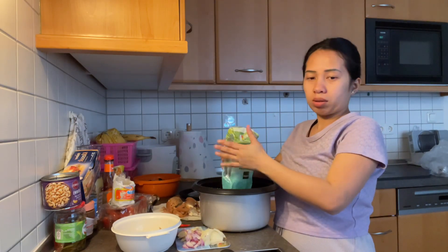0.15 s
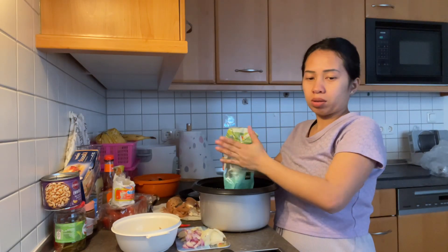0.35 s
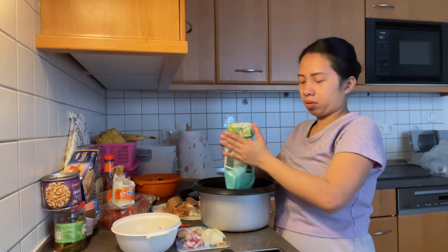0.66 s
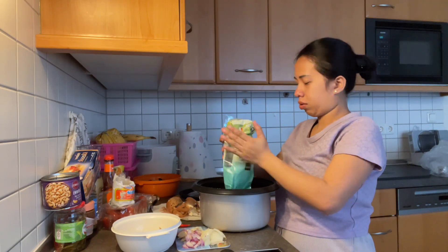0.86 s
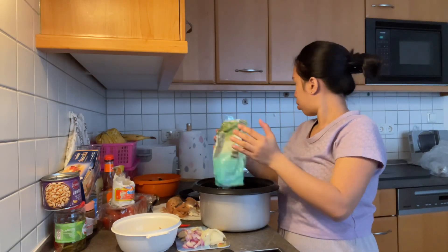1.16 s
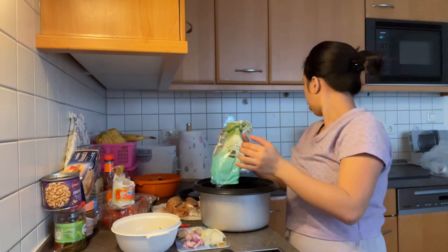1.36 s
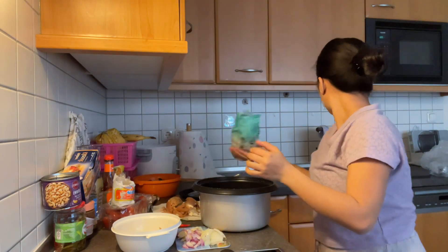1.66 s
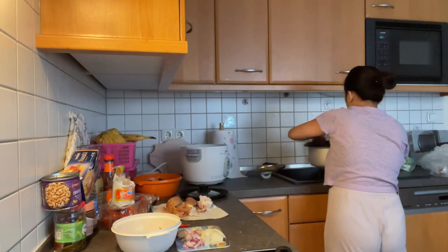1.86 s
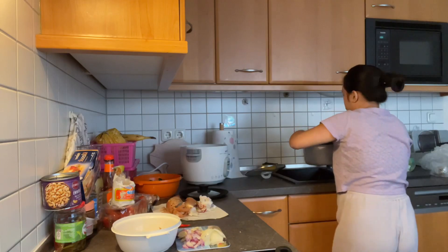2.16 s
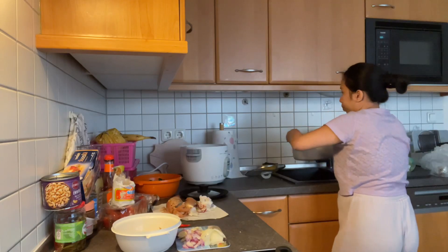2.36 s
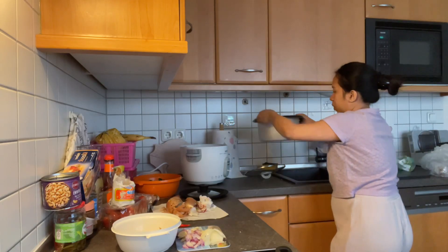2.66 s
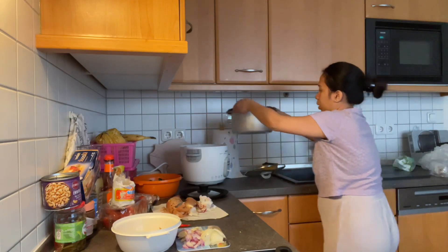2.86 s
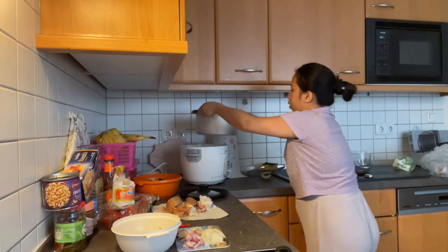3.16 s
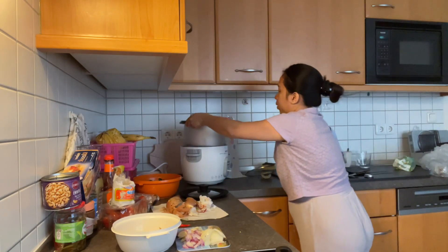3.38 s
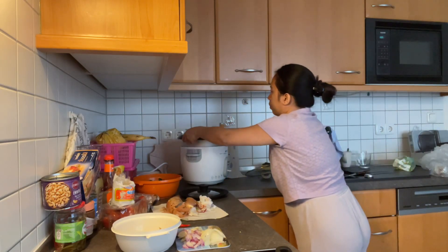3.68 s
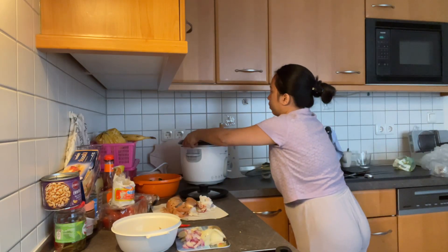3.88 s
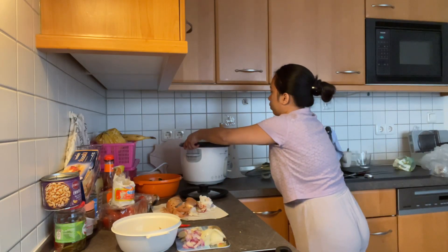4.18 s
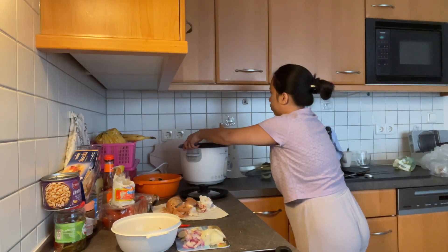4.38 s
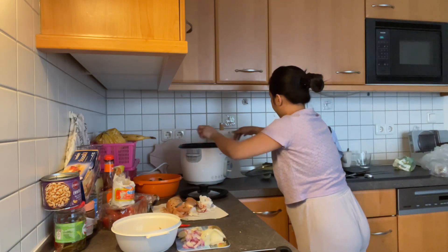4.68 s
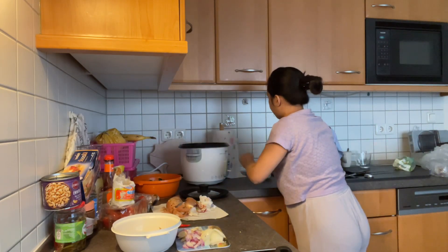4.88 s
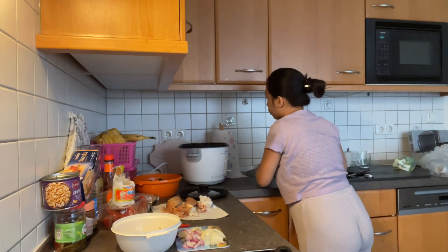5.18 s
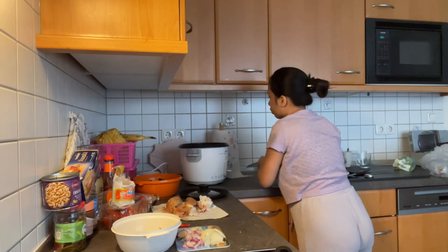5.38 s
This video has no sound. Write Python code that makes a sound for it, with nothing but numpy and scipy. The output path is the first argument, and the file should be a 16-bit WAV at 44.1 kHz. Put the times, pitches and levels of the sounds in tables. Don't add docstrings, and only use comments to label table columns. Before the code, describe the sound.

Hands pat a plastic bag, shaking dry grains into a booming metal pot; then plastic snaps, a pot clanks into its cooker and knocks the counter.

```python
import sys
import numpy as np
from scipy import signal
from scipy.fft import rfft, irfft, next_fast_len
from scipy.io import wavfile
from scipy.ndimage import uniform_filter1d

SR = 44100
rng = np.random.default_rng(int(sys.argv[2]) if len(sys.argv) > 2 else 0)


def to_wav(sig):
    pcm = np.clip(np.atleast_2d(sig), -1, 1) * 32767
    pcm = np.round(pcm).astype(np.int16)
    wavfile.write(sys.argv[1], SR, pcm.T)


def to_linear_factor(level_db):
    exponent = np.asarray(level_db, float) / 20
    return 10 ** exponent


N = 244049
TIME_S = np.arange(N) / SR
CHANGE_S = 1.798


def rms_one(x):
    return x / np.sqrt(np.mean(x ** 2) + 1e-20)


def in_time(rows):
    s, level_db = np.transpose(rows)
    return np.interp(TIME_S, s, level_db)


def at_hz(points, hz):
    point_hz, value = np.transpose(points)
    return np.interp(np.log(hz + 1), np.log(point_hz), value)


def coloured(x, spectrum):
    size = next_fast_len(N)
    gain = to_linear_factor(at_hz(spectrum, np.fft.rfftfreq(size, 1 / SR)))
    return irfft(rfft(x, size) * gain, size)[..., :N]


def band(x, low_hz, high_hz):
    edges_hz = [low_hz, min(high_hz, 0.49 * SR)]
    return signal.sosfilt(signal.butter(2, edges_hz, "band", fs=SR, output="sos"), x)


def below(x, hz):
    return signal.sosfiltfilt(signal.butter(2, hz, fs=SR, output="sos"), x)


def ring(clicks, hz, t60_s):
    r = to_linear_factor(-60 / (max(t60_s, 0.003) * SR))
    w = 2 * np.pi * hz / SR
    return signal.lfilter([0, np.sin(w)], [1, -2 * r * np.cos(w), r * r], clicks + 1e-18)


def dying(t60_s, rise_s, size=22050):
    t = np.arange(size) / SR
    rise = 1 - np.exp(-t / max(rise_s, 1e-5))
    return t, rise * to_linear_factor(-60 * t / max(t60_s, 0.003))


def add(track, s, sound):
    i = round(s * SR)
    track[..., i:i + sound.shape[-1]] += sound[..., :N - i]


def grains(per_s, spread_db):
    sizes = to_linear_factor(spread_db * np.minimum(rng.exponential(1, N), 4)) * rng.choice([-1, 1], N)
    return rms_one(sizes * (rng.random(N) < per_s / SR))


def drift(rate_hz):
    knots = rng.standard_normal(2000)
    return np.interp(TIME_S * rate_hz, np.arange(len(knots)), knots)


def touch_rings(touches):
    out = np.zeros(N)
    for (s, db, hz, t60_s), turns in zip(touches, rng.random((len(touches), 2))):
        t, env = dying(t60_s, rise_s=0.0015, size=13000)
        pair = np.sin(2 * np.pi * (hz * t + turns[0]))
        pair += 0.36 * np.sin(2 * np.pi * (1.1 * hz * t + turns[1]))
        add(out, s, to_linear_factor(db) * env * pair)
    return out


# [t/s, level/dB, rise/s, fall/s; both over 20 dB]
LEANS = [
    (2.93, -51, 0.13, 0.05),
    (3.999, -43.5, 0.16, 0.17),
    (4.192, -29, 0.036, 0.13),
    (4.502, -33, 0.22, 0.02),
    (4.71, -49.5, 0.3, 0.14),
    (5.1, -63.5, 0.18, 4.5),
]


def counter_hum():
    load = 0
    for s, db, rise_s, fall_s in LEANS:
        load = load + to_linear_factor(db - 20 * np.maximum((s - TIME_S) / rise_s, (TIME_S - s) / fall_s))
    hum_hz = 44 + 2.0 * drift(6.6)
    hum = (to_linear_factor(-59.5) + load) * np.sin(2 * np.pi * np.cumsum(hum_hz) / SR)
    rumble_level = np.minimum(to_linear_factor(-65) + load * to_linear_factor(-7.5), to_linear_factor(-56.5))
    rumble = rumble_level * rms_one(band(rng.standard_normal(N), 44, 93.6))
    wake = np.clip((TIME_S - CHANGE_S) / 0.16, 0, 1) ** 2
    return (hum + rumble) * wake * to_linear_factor([[1.5], [-1.5]])


def wide_noise(spectrum, side_gain):
    mid, side = rms_one(coloured(rng.standard_normal((2, N)), spectrum))
    return mid + side_gain * side * [[1], [-1]]


# [t/s, level/dB]
HANDLING = [(1.82, -67.5), (2.02, -63.5), (2.19, -72), (2.58, -62.5), (2.95, -67.5), (3.06, -54.5),
            (3.22, -67), (3.4, -61), (3.63, -67), (3.83, -58.5), (4.0, -74), (4.17, -44), (4.36, -55.5),
            (4.55, -53), (4.65, -54.5), (4.71, -68.5), (5.15, -67), (5.53, -70)]
# [f/Hz, level/dB per Hz]
RUSTLE = [(150, 13), (250, -10), (343, -10), (768, -13.5), (1130, -5), (1880, -7), (2200, -7.5),
          (3120, -9.5), (3530, -13.5), (5760, -15), (9250, -8), (10300, -43), (10800, -43), (13400, -9.5),
          (16500, -101)]


def hand_rustle():
    return to_linear_factor(in_time(HANDLING) + 0.5 * drift(24)) * band(wide_noise(RUSTLE, 1.11), 217, 5240)


# [t/s, level/dB]
FILM = [(1.85, -80), (1.96, -72.5), (2.08, -71), (2.16, -70), (2.3, -73), (2.82, -80.5), (3.13, -81.5),
        (3.53, -75.5), (4.04, -85), (4.19, -80), (4.31, -77), (4.35, -68), (4.48, -74), (4.65, -81),
        (4.77, -85), (5.02, -80.5), (5.53, -83.5)]
# [f/Hz, level/dB per Hz]
THIN = [(3500, -8), (5500, -36), (7000, -23), (9250, 1.5), (10300, -17), (11500, -9.5), (12800, -7),
        (15200, -14)]


def film_rustle():
    film_db = in_time(FILM)
    flicker = to_linear_factor(4 * drift(11))
    film = band(wide_noise(THIN, 1.1), 2500, 15000)
    lower = below(film, 7500)
    fill = to_linear_factor(0.48 * (film_db - film_db.mean()) + 2.1 * drift(22))
    return to_linear_factor(film_db + 1.0) * flicker * (film - lower + fill * lower)


# [t/s, level/dB, centre f/Hz, t60/s]
SWISH = [
    (2.79, -68.5, 450, 0.87),
    (3.064, -53, 1304, 0.4),
    (3.23, -57.5, 301, 0.37),
    (3.868, -58, 560, 0.49),
    (4.56, -45.5, 2300, 0.32),
]


def swish():
    out = np.zeros(N)
    for s, db, hz, t60_s in SWISH:
        t, env = dying(t60_s, rise_s=0.0025)
        add(out, s, to_linear_factor(db) * env * rms_one(band(rng.standard_normal(len(t)), 0.74 * hz, 1.4 * hz)))
    return out


# [t/s, peak level/dB, thud f/Hz, thud t60/s, scuff level/dB]
KNOCK = [(2.1458, -63, 71.7, 0.29, -44), (2.871, -54.5, 160.8, 0.35, -44),
         (3.199, -52.5, 169.2, 0.32, -53.5), (3.244, -43, 154.1, 0.24, -57),
         (3.865, -62, 75.5, 0.43, -50.5), (4.139, -45.5, 129.8, 0.39, -61), (4.325, -49, 74.6, 0.69, -42.5),
         (4.376, -32.5, 117, 0.41, -32.5), (4.397, -28, 99.8, .3, -48), (4.56, -43.5, 126, 0.24, -43),
         (5.181, -49.5, 131, 0.25, -62.5), (5.211, -35, 119, 0.093, -44), (5.239, -35.5, 88.4, 0.26, -48.5),
         (5.288, -43.5, 126, 0.38, -66)]
# [t/s, level/dB]
SLIDES = [
    (2.146, -57),
    (2.871, -56),
    (4.138, -34.5),
    (4.325, -45.5),
    (4.369, -32.5),
    (5.2, -83),
]


def knocks():
    thud, scuff, wash = np.zeros((3, N))
    for s, db, hz, t60_s, scuff_db in KNOCK:
        t, env = dying(t60_s, rise_s=0.0018)
        pair = np.sin(2 * np.pi * hz * t) + 0.62 * np.sin(2 * np.pi * 1.1 * hz * t)
        add(thud, s, to_linear_factor(db) * env * pair)
        add(scuff, s, to_linear_factor(scuff_db + 4.5) * dying(0.66 * t60_s, rise_s=0.0027)[1])
    for s, slide_db in SLIDES:
        add(wash, s, to_linear_factor(slide_db) * dying(0.27, rise_s=0.001)[1])
    rub = band(grains(per_s=3900, spread_db=4.0), 410, 1810)
    slide = grains(per_s=9300, spread_db=0.5)
    slide = band(slide, 1650, 7630) + 0.12 * band(slide, 12800, 14000)
    return thud + scuff * rub + wash * slide


# [t/s, level/dB, f/Hz, t60/s]
LOCAL_RINGS = [(4.176, -40, 500, 0.1), (4.236, -43, 550, .07), (4.325, -50, 1134, 0.079), (4.399, -40, 765, 0.14),
               (4.421, -50, 430, .07), (4.461, -47.5, 775, .3), (4.557, -43, 3120, 0.09), (4.591, -56, 302, 0.09),
               (4.601, -57, 771, 0.25), (5.202, -47, 741, .035), (5.211, -68, 3710, .11),
               (5.231, -54, 1270, 0.076), (5.241, -61, 2160, 0.14), (5.301, -62, 2230, .18),
               (5.356, -80, 5260, .35), (5.446, -68, 2050, 0.29), (5.516, -69, 3570, 0.027)]


def local_rings():
    return touch_rings(LOCAL_RINGS)


# [t/s, blow level/dB, scrape t60/s]
CLANKS = [
    (4.139, -52.5, 0.089),
    (4.31, -68, 0.18),
    (4.368, -51.5, 0.056),
    (5.195, -63.5, 0.095),
    (5.232, -69, 0.072),
    (5.395, -81.5, 0.121),
    (5.45, -87, 0.089),
]
# [f/Hz, level/dB, t60/s]
RIM = [(440, -11.5, 0.21), (464, -10.5, 0.084), (501, 2, 0.09), (560, -4.5, 0.14), (598, -12.5, 0.1),
       (1114, -13.5, 0.13), (1400, -9.5, 0.091), (1809, -7, 0.064), (2300, -14.5, 0.1), (3390, -19, .08),
       (4370, -5.5, 0.12), (4850, -10, 0.08)]
SEAT = [(183.3, -1.5, 0.35), (283, -9, 0.14), (429.4, -1.5, 0.16), (493.6, 2.5, 0.095), (575, -11, 0.38),
        (766, -7, 0.35), (1068, -1.5, 0.14), (1107, 2, 0.042), (1230, -10, 0.14), (1408, -11, 0.18),
        (1820, -5, 0.11), (1930, -9, 0.068), (2540, -9, .1), (3050, -6, 0.078)]
UTENSIL = [(550, -8.5, 0.033), (730, -1, 0.017), (1030, -10, 0.032), (1253, -2, 0.034), (1490, -15, 0.037),
           (2160, -26, 0.25), (2600, -13.5, 0.074), (3200, -23, 0.08), (5030, -28.5, 0.23)]
TINES = [(855, -6.5, 0.07), (1350, -9, .08), (2047, -19, 0.21), (2230, -7.5, 0.1), (3000, -6.5, 0.077),
         (4000, -14.5, 0.12), (5200, -20, 0.14)]


def clanks():
    out = np.zeros(N)
    struck = [RIM, RIM[:5], SEAT, UTENSIL, UTENSIL, TINES, TINES]
    for (s, db, t60_s), modes in zip(CLANKS, struck):
        t, env = dying(t60_s, rise_s=0.0044)
        for hz, mode_db, ring_t60_s in modes:
            scrape = to_linear_factor(db + mode_db) * env * rng.standard_normal(len(t))
            add(out, s, ring(scrape, hz, ring_t60_s))
    return out


def snap(hz, top_db, low_db, crisp_db, edge_hz):
    def burst(t60_s, rise_s):
        return dying(t60_s, rise_s, size=4410)[1]

    common, apart = rng.standard_normal((2, 4410))
    noise = 0.61 * common + apart * [[0.19], [0.061]]
    t, env = dying(0.012, rise_s=0.0003, size=4410)
    pair = np.sin(2 * np.pi * hz * t) + 0.46 * np.sin(2 * np.pi * 1.115 * hz * t)
    out = env * pair + 3.24 * burst(0.04, 0.0014) * band(noise, 0.927 * hz, 1.106 * hz)
    out += to_linear_factor(crisp_db) * burst(0.015, 0.0001) * band(band(noise, 4800, 8900), 4800, 8900)
    out += to_linear_factor(top_db + 6.0) * burst(0.019, 0.00043) * band(noise, 0.51 * edge_hz, edge_hz)
    out += to_linear_factor(low_db + 14.5) * burst(0.029, 0.0024) * band(noise, 570, 1620)
    return out


# [t/s, peak level/dB, ring f/Hz, dull and crisp level/dB re peak]
CARRY_SNAPS = [(1.8596, -49, 2390, -30, -13), (2.146, -40, 2700, -6, -12), (2.183, -41.5, 1130, 7, 1),
               (2.2081, -36, 2960, -16, -21), (2.223, -36.5, 3160, -25, -17),
               (2.2598, -32.5, 2120, -21, -8), (2.392, -37.5, 2940, -38, -29),
               (2.4135, -37.5, 2410, -20, -13), (2.4718, -40, 3080, -17, -7), (2.5615, -42, 2960, -22, 4),
               (2.635, -40, 2150, -12, -15), (2.6453, -27, 2755, -13, -14.5),
               (2.8732, -36, 2700, -3.5, -12), (3.0689, -49.5, 1640, 9, -14),
               (3.0778, -40, 2790, -2.5, -4.5), (3.268, -52.5, 2220, -11, -11)]
SEAT_SNAPS = [(3.4297, -43, 3000, -11, -8), (3.4885, -50, 2340, -14, -18), (3.5118, -46, 2550, -15.5, -9),
              (3.5165, -36.5, 2700, -16, -16), (3.6121, -30.5, 2724, -11.5, -15),
              (3.7334, -33.5, 2850, -22, -16), (3.7783, -45, 2820, -39, -3),
              (3.929, -37.5, 2800, -8.5, -11), (3.9848, -41, 2870, -18, -12), (4.0522, -38, 2750, -17, -14),
              (4.0667, -34, 2120, -6, -21), (4.127, -36.5, 2700, -6, -23), (4.2, -35.5, 2700, -23, -17),
              (4.3301, -42.5, 3100, -16, 4), (4.5423, -41, 2700, -25, -22), (4.5545, -29, 3050, -24, -10),
              (4.556, -33, 2030, -14, -18), (4.8286, -43, 2140, -17, -14), (4.9167, -37.5, 2070, -18, -31),
              (4.9317, -33, 2770, -17, -27), (5.0412, -35, 2820, -18.5, -16), (5.3216, -50, 2740, -25, -5)]
# [t/s, peak level/dB, ring f/Hz, bright level/dB re peak]
TICKS = [(1.9737, -50.5, 1810, 5.5), (2.004, -46.5, 3100, -3), (2.038, -51, 3180, -2.5),
         (2.1151, -42.5, 2490, -10), (2.172, -43, 3070, -8), (2.182, -37, 3350, 3.5),
         (2.3028, -57.5, 2490, 7.5), (2.494, -51, 1720, 3.5), (2.5391, -45.5, 2950, -4),
         (2.596, -42, 3060, -7), (2.689, -37.5, 3060, -16), (2.9037, -42.5, 2620, -1),
         (2.972, -39, 2790, -8), (3.5739, -46.5, 12800, -16), (4.599, -50.5, 4620, -20),
         (4.621, -46, 3180, -7.5), (4.717, -57, 13700, 2.5), (4.8292, -61, 4530, -4),
         (4.96, -56.5, 2700, 7), (2.294, -60, 9100, 1), (2.853, -63, 8140, -3), (2.985, -63, 13000, 11),
         (3.267, -66, 4460, 6), (3.468, -64, 13400, 2), (3.492, -71, 13700, -8), (3.93, -69, 13900, 7),
         (5.3221, -66, 5530, -12), (4.8185, -63, 8830, -22), (4.858, -64, 8900, -21),
         (5.0258, -72, 9030, -22), (5.084, -63, 8930, -22), (5.13, -64, 8830, -22)]


def crackles():
    out = np.zeros((2, N))
    events = []
    for s, db, hz, low_db, crisp_db in list(CARRY_SNAPS) + list(SEAT_SNAPS):
        events.append((s, db, snap(hz, -57, low_db, crisp_db, edge_hz=7100)))
    for s, db, hz, top_db in TICKS:
        events.append((s, db, snap(hz, top_db, low_db=-19, crisp_db=-9.5, edge_hz=12500)))
    for s, db, sound in events:
        pan_db = 6 + 13 * rng.uniform(-1, 1)
        add(out, s, sound * to_linear_factor([[db + 0.5 + pan_db / 2], [db + 3.5 - pan_db / 2]]))
    return out


# [t/s, level/dB, f/Hz, t60/s]
PINGS = [(0.0947, -22.5, 3007, 0.031), (0.1, -30.5, 992, 0.054), (0.2585, -14.5, 3050, 0.023),
         (0.264, -19.5, 1592, 0.06), (0.264, -27.5, 602, 0.067), (0.308, -33.5, 420, 0.044),
         (0.344, -35, 5500, 0.039), (0.433, -22.5, 1450, 0.05), (0.43, -19, 2910, 0.033),
         (0.434, -27, 1230, 0.042), (0.4653, -22.5, 3500, .02), (0.4785, -28, 3730, .02),
         (0.5057, -30, 1320, 0.02), (0.5926, -21.5, 1577, .05), (0.6, -28.5, 286, 0.12),
         (0.625, -29.5, 433, 0.12), (0.6644, -22.5, 1620, 0.059), (0.6644, -26, 3310, 0.039),
         (0.7706, -23.5, 723, 0.13), (0.775, -27.5, 440.5, 0.058), (0.784, -24, 407, 0.021),
         (0.42, -35.5, 418, 0.044), (0.47, -36, 444, 0.074), (0.95, -36, 580, 0.044),
         (1.659, -36, 487, 0.035), (1.66, -47, 747, 0.04), (1.735, -48, 597, .05),
         (1.301, -44.5, 1050, 0.042), (0.805, -29, 420, 0.039), (0.8155, -17, 1630, 0.05),
         (0.8155, -30, 1260, 0.061), (0.831, -21, 3150, 0.045), (0.95, -18, 1607, 0.055),
         (0.9478, -19, 2500, 0.023), (0.984, -25.5, 1634, 0.048), (0.9862, -32, 3660, 0.028),
         (1.1365, -30, 3350, 0.026), (1.1189, -38.5, 4450, 0.021)]


def clump_pings():
    return touch_rings(PINGS)


def pot_air():
    murmur = np.zeros(N)
    for s, db, *_ in PATS:
        add(murmur, s, to_linear_factor(-33 + 0.46 * db) * dying(0.95, rise_s=0.03)[1])
    return murmur * rms_one(band(ring(rng.standard_normal(N), 105, 0.078), 85, 230))


# [f/Hz, level/dB, t60/s]
POT = [(436, -8.5, 0.014), (512.5, -4, 0.068), (589.5, -2.5, 0.071), (815, 1.5, 0.015), (990, -5, 0.0037),
       (1275, -8, 0.067), (1470, 0, 0.021), (1690, -7.5, 0.04), (1970, -7.5, 0.065), (2328, -18.5, 0.046),
       (2700, -16.5, 0.026), (3350, -5, 0.054)]


def pot_wall(impacts):
    modes = [to_linear_factor(db) * ring(impacts, hz, min(t60_s, 0.06)) for hz, db, t60_s in POT]
    return to_linear_factor(-46.0) * rms_one(sum(modes))


# [t/s, peak level/dB, top re middle level/dB, t60/s]
CRUNCH = [(0.095, -21, -5, 0.063), (0.144, -26, 0, 0.042), (0.257, -17.5, -1, 0.027),
          (0.2609, -16, 3, 0.022), (0.2672, -16.5, 1, 0.021), (0.274, -21, -6.5, 0.062),
          (0.3093, -21.5, -18.5, 0.039), (0.341, -30.5, 7, 0.029), (0.4181, -18.5, -1, 0.055),
          (0.4284, -12, 5, 0.021), (0.438, -18.5, -2, 0.031), (0.4645, -13.5, 7.5, 0.027),
          (0.477, -21, 4.5, 0.038), (0.5047, -23.5, 8, 0.037), (0.5904, -14, -8, 0.037),
          (0.5963, -15, -2.5, 0.049), (0.6194, -28, -4.5, 0.039), (0.6627, -15, -0.5, 0.022),
          (0.7702, -16.5, -8, 0.045), (0.7758, -15, -0.5, 0.029), (0.782, -17, -3, 0.036),
          (0.8145, -18.5, -5, 0.063), (0.841, -25, -12.5, 0.083), (0.832, -17.5, 5, 0.019),
          (0.938, -20, -11, 0.05), (0.9447, -19.5, -2, 0.02), (0.9486, -15, -2.5, 0.049),
          (0.981, -24.5, -10.5, 0.056), (0.988, -24, -8, 0.043), (1.118, -25.5, -8.5, 0.048),
          (1.1365, -24, -24, 0.039), (1.233, -36.5, 11, 0.018), (1.392, -40.5, -14, 0.073),
          (1.4165, -38.5, -9, 0.072), (1.6559, -30.5, -16, 0.046), (1.7315, -33, -18, 0.032)]
# [t/s, level/dB]
TRICKLE = [
    (0.0, -36.5),
    (0.138, -49),
    (0.354, -53.5),
    (0.468, -40.5),
    (0.848, -52),
    (1.01, -46),
    (1.206, -62.5),
    (1.724, -64),
    (1.77, -68),
]
# [f/Hz, level/dB per Hz]
GRAIN = [(120, -17), (200, -0.5), (317, -27), (411, -10), (829, -9), (1610, -6), (2130, -6), (8330, -14.5),
         (11200, -24), (13500, -20.5), (16200, -28.5)]


def rice():
    open_pot = TIME_S < 1.78
    low, middle, top = to_linear_factor(in_time(TRICKLE) + np.array([[1.5], [0.4], [-2.5]])) * open_pot
    for s, db, top_db, t60_s in CRUNCH:
        low_db = -16 + sum(body_db for pat_s, *_, body_db in PATS if abs(s - pat_s) < 0.026)
        env = dying(t60_s, rise_s=0.0019)[1]
        add(middle, s, to_linear_factor(db - 4) * env)
        add(top, s, to_linear_factor(db + top_db + 5) * env)
        add(low, s, to_linear_factor(db + low_db + 7.5) * env ** 0.59)
    clumps = to_linear_factor(1.6 * drift(300))
    places = [rms_one(coloured(grains(per_s=9000, spread_db=2.5), GRAIN)) for _ in range(3)]
    hits = np.array(places) * clumps
    body, dull = below(hits, 900), below(hits, 5000)
    centre, left, right = low * body + middle * (dull - body) + top * (hits - dull)
    aside = to_linear_factor(-2) * band(np.array([left, right]), 200, 4500)
    return centre + pot_wall(centre) + pot_air() * open_pot, aside


# [t/s, boom peak level/dB, boom f/Hz, boom t60/s, crunch body level/dB]
PATS = [
    (0.089, -27.5, 120, 0.18, 0),
    (0.274, -20.5, 118, 0.074, 2.5),
    (0.416, -29, 134, 0.24, 6.5),
    (0.597, -23, 115, 0.1, 3.5),
    (0.777, -22, 118.3, 0.15, 4.5),
    (0.9478, -19.5, 125.6, 0.076, 3.5),
    (1.137, -32, 128, 0.12, 4.5),
    (1.239, -44, 124, 0.12, -0.5),
    (1.425, -44.5, 120, 0.11, 7.5),
    (1.575, -43, 134, 0.058, 0.0),
]


def pats():
    out = np.zeros(N)
    for s, db, hz, t60_s, _ in PATS:
        t, env = dying(t60_s, rise_s=0.0063)
        sagging_t = t + 0.00067 * (1 - np.exp(-t / 0.0017))
        add(out, s, to_linear_factor(db + 9) * env * np.sin(2 * np.pi * hz * sagging_t))
        add(out, s, to_linear_factor(db - 1.5) * env ** 1.2 * np.sin(2 * np.pi * 195 * t))
    return out


# [f/Hz, t60/s]
KITCHEN_T60 = [(100, 0.19), (500, 0.48), (3000, 0.44), (10000, 0.28)]


def kitchen(x):
    t, tail = np.arange(SR // 2) / SR, 0
    for hz in 125 * 2 ** np.arange(8):
        noise = band(rng.standard_normal((2, len(t))), hz / np.sqrt(2), hz * np.sqrt(2))
        tail = tail + noise * to_linear_factor(-60 * t / max(at_hz(KITCHEN_T60, hz), 0.05)) * (t > 0.005)
    tail = tail / np.sqrt(np.sum(tail ** 2) / 2)
    return signal.fftconvolve(x[None], tail, axes=1)[:, :N]


# [f/Hz, level/dB]
LEAN = [(60, -6.5), (110, 7.5), (200, 4), (380, 7), (700, 6), (1290, 0.5), (2380, 3), (4400, 0), (8120, 3),
        (15000, -1.5)]
# [f/Hz, phase/rad]
LEAD = [(100, 0.1), (250, .7), (500, 1.6), (2000, 1.3), (5000, 1.2), (8000, 2.0), (10000, 1.8),
        (13000, 1.1)]


def ports(x):
    size = next_fast_len(N)
    hz = np.fft.rfftfreq(size, 1 / SR)
    half = to_linear_factor(at_hz(LEAN, hz) / 2) * np.exp(0.5j * at_hz(LEAD, hz))
    return irfft(rfft(x, size) * np.array([half, 1 / half]), size)[:, :N]


def scene_change():
    cut_db = -46 * np.clip((TIME_S - 1.765) / 0.0092, 0, 1)
    fade_in_db = np.minimum(-52 * np.exp(-(TIME_S - CHANGE_S) * np.log(10) / 0.064), 0)
    return to_linear_factor(np.where(TIME_S < CHANGE_S, cut_db, fade_in_db))


def scene():
    background = counter_hum() + (hand_rustle() + film_rustle()) * (np.arange(N) > 1.79 * SR)
    blows = swish() + knocks() + local_rings() + clanks()
    snaps = crackles()
    snap = snaps.mean(0)
    far = to_linear_factor(-5.5) * blows + to_linear_factor(-7.0) * snap
    far += to_linear_factor(-20.5) * band(snap, 2750, 3200) + to_linear_factor(-9.5) * band(snap, 4500, 6700)
    second = ports(blows) + snaps + kitchen(far) + background

    pinged = clump_pings()
    bag, aside = rice()
    first = ports(pats() + bag + pinged) + aside + kitchen(to_linear_factor(-6.5) * bag + to_linear_factor(-12) * pinged)
    first = first * (np.arange(N) < 1.795 * SR)
    return (first + second) * scene_change()


# [f/Hz, level/dB]
SPARED = [(3700, -37), (7200, -38.5), (8000, -55), (9600, -46), (10300, -30.5), (10700, -28),
          (11900, -24.5), (12400, -40), (14500, -34), (15500, -32), (16300, -23)]


def starved(x):
    stft = dict(nperseg=2048, noverlap=1024, window="cosine")
    hz, t, frames = signal.stft(x, SR, **stft)
    power = np.abs(frames) ** 2
    whole = power[:, hz > 500].sum(1)
    ease_db = 0.37 * np.maximum(10 * np.log10(whole + 1e-20) + 59, 0)
    for low_hz in np.arange(3735, 17000, 345):
        inside = (hz >= low_hz) & (hz < low_hz + 345)
        waver = uniform_filter1d(rng.standard_normal(len(t)), size=3) * np.sqrt(3)
        share_db = at_hz(SPARED, low_hz) + 5 * waver - ease_db
        kept = power[:, inside].sum(1) > whole * to_linear_factor(2 * share_db)
        frames[:, inside] *= kept[:, None]
    return signal.istft(frames, SR, **stft)[1][:, :N]


def low_pass(x):
    return signal.sosfilt(signal.butter(12, 16970, fs=SR, output="sos"), x)


def record(dry):
    dry = signal.sosfilt(signal.butter(4, 36, "high", fs=SR, output="sos"), dry)
    rounded = 0.6 * np.tanh(dry / 0.6)
    dry = signal.sosfilt(signal.cheby2(10, 50, 17000, fs=SR, output="sos"), rounded)
    dip = signal.sosfiltfilt(signal.butter(4, [10200, 12100], "band", fs=SR, output="sos"), dry)
    mix = starved(dry - 0.63 * dip)
    return low_pass(mix)


dry = scene()
out = record(dry)
to_wav(out)
```